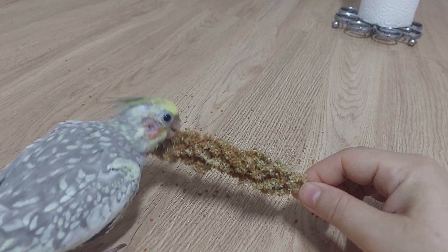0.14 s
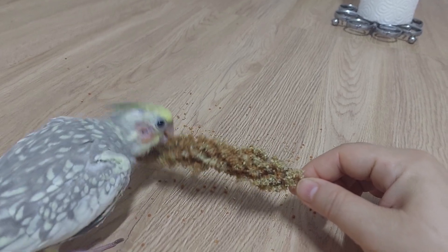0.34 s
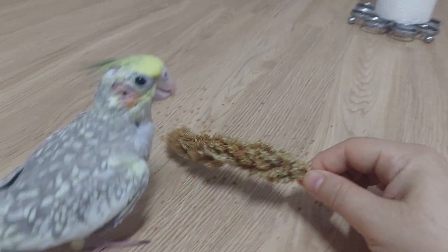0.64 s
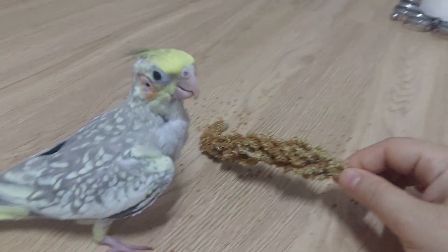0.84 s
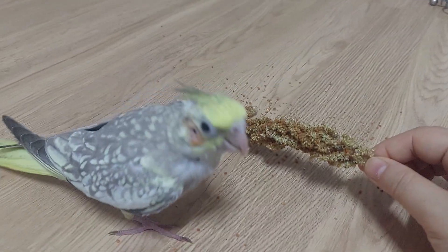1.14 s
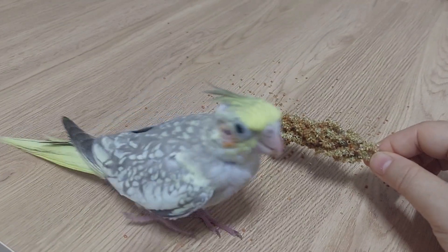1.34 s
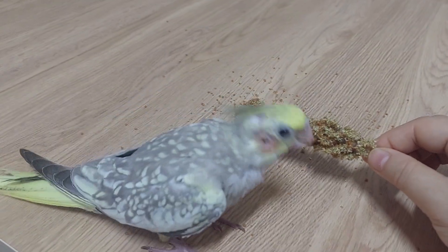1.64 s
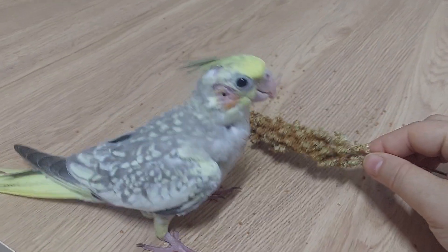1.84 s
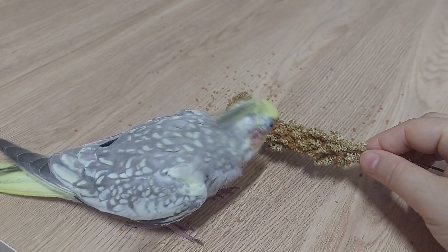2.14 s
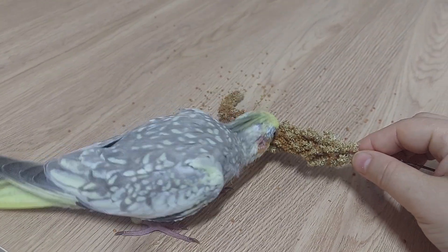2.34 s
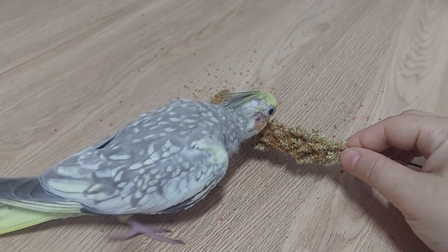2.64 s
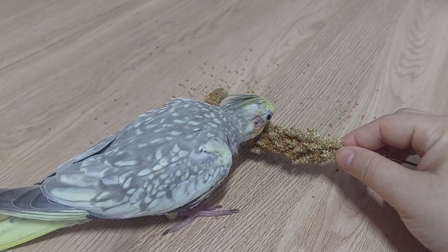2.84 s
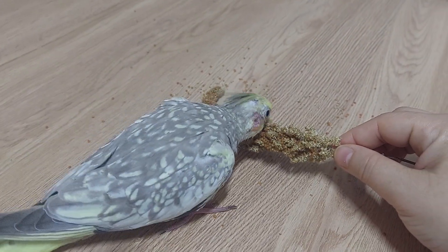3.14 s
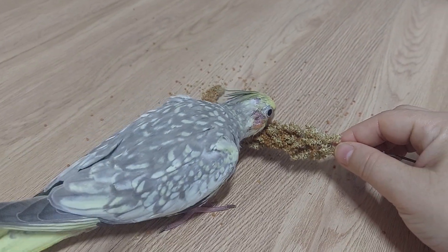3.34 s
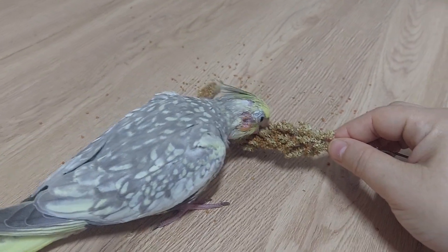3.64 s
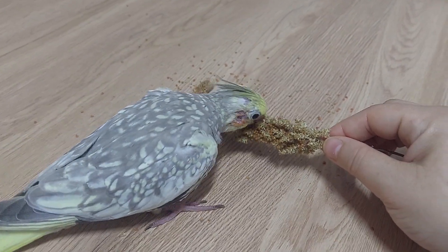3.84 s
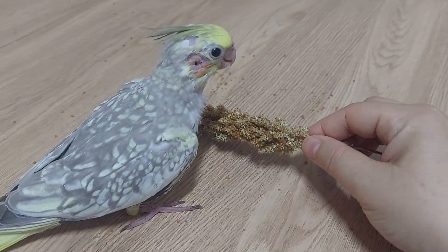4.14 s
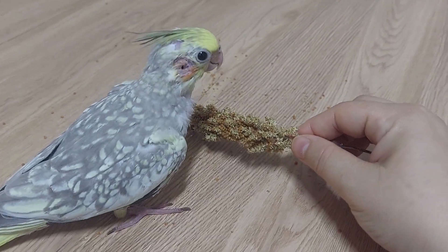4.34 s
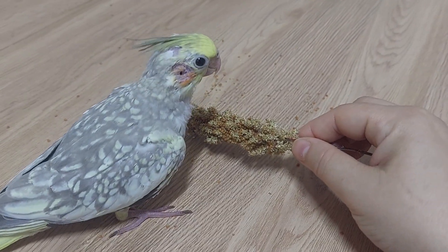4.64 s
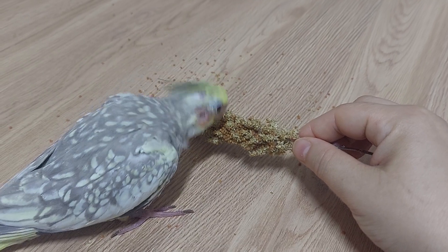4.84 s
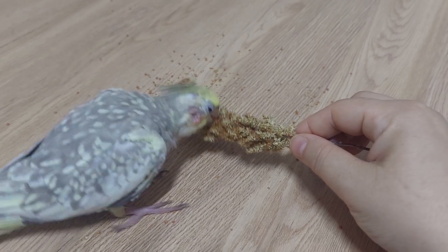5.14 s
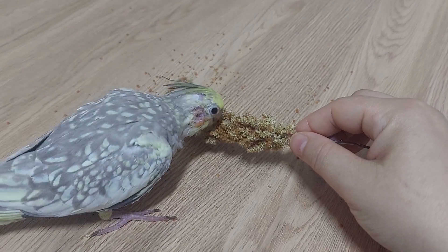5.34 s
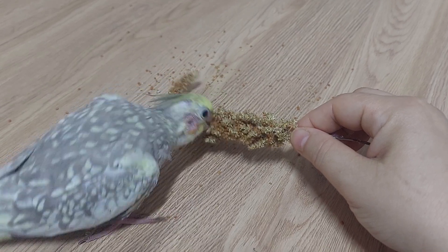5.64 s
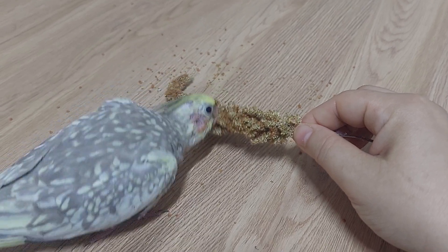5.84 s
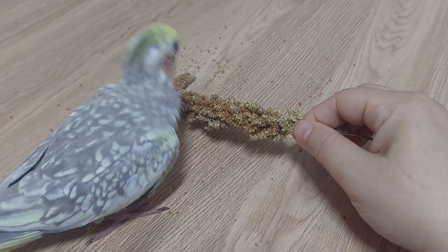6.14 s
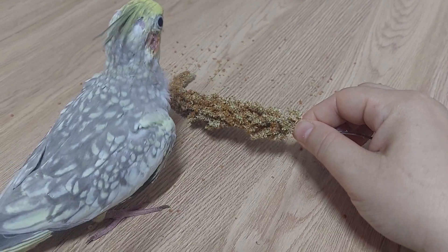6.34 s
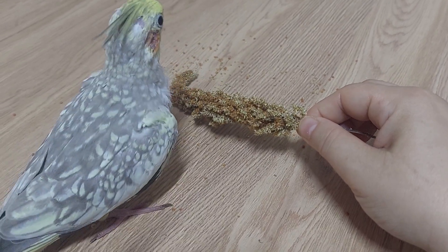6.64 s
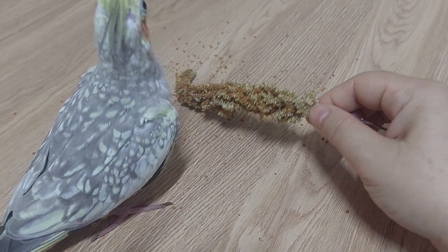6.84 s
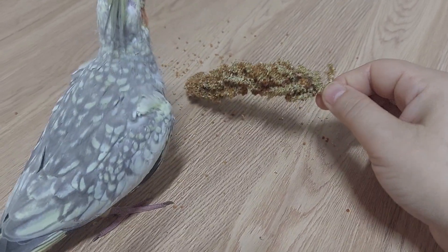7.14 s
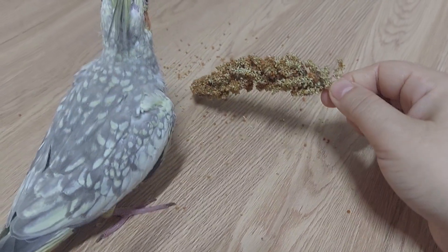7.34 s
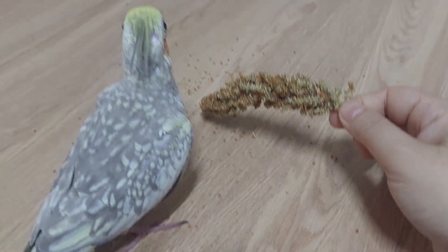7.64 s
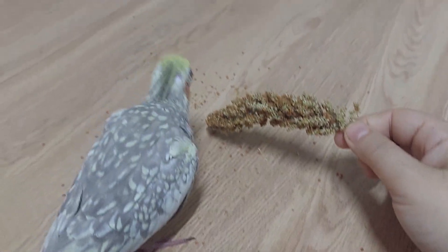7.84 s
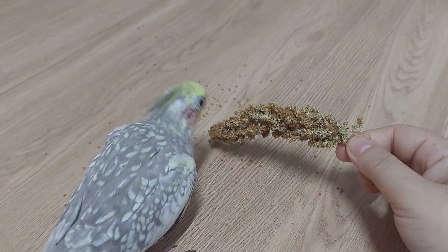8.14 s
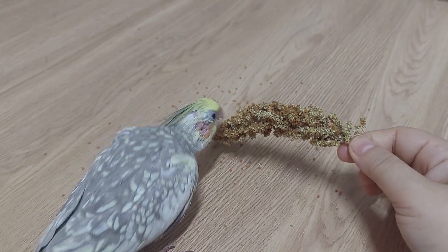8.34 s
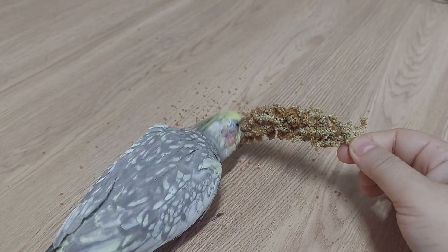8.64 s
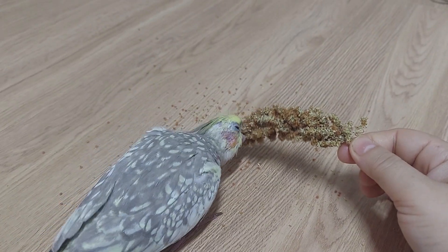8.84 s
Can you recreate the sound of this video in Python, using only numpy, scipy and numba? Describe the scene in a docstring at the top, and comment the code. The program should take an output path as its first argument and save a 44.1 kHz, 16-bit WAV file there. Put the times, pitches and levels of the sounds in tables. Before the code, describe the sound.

Harsh, noisy bird begging dominates: a short nasal note with a squeak, then long and short scratchy wheezes with barely a tenth of a second between them. Their tone shifts from bright and open to rough and whistly as the head dips to a millet spray. Every call stops abruptly on a tiny upward squeak. Light foot taps on wood, a few seed clicks, short room reflections, faint steady air, close stereo pickup.

```python
"""A cockatiel chick begs for a millet spray on a wooden surface in a quiet room, close to a two-port microphone.
Over steady room air, a short clear note of evenly beating syrinx comes first and ends in a rising squeak.
Then eleven rasps follow, from 60 ms to over a second: the syrinx flutters irregularly and rings the windpipe,
mouth and beak, then snaps shut with a tiny rising squeak. Feet patter on the wood from the first rasp on,
seeds and beak tick in the second half, and the room answers every sound briefly."""
import sys
import numpy as np
from scipy import signal
from scipy.fft import rfft, irfft, next_fast_len
from scipy.io import wavfile
from scipy.ndimage import uniform_filter1d, map_coordinates
from numba import njit

SR = 44100
rng = np.random.default_rng(int(sys.argv[2]) if len(sys.argv) > 2 else 0)


def file_out(sig):
    """Save sig as 16-bit WAV at sys.argv[1]."""
    # one column per channel
    cols = np.atleast_2d(sig).T
    # limit, then scale
    lim = np.clip(cols, -1, 1)
    pcm = np.round(lim * 32767).astype(np.int16)
    wavfile.write(sys.argv[1], SR, pcm)


N = 396459
TIME = np.arange(N) / SR


def undb(db):
    """Decibels to gain."""
    return 10 ** (np.asarray(db) / 20)


def unit(x):
    """Scale to rms 1."""
    return x / np.sqrt(np.mean(x ** 2))


def curves(rows):
    """Each column of a table, joined by straight lines in time."""
    s, *columns = np.transpose(rows)
    return [np.interp(TIME, s, column) for column in columns]


def over_frequency(rows):
    """Each column of a table, joined on a log-frequency axis, for every bin of the spectrum."""
    hz, *columns = np.transpose(rows)
    bins_hz = np.fft.rfftfreq(next_fast_len(N + SR, True), 1 / SR)
    return [np.interp(np.log(bins_hz + 1), np.log(hz), column) for column in columns]


def filtered(x, response):
    """Apply a frequency response."""
    size = next_fast_len(N + SR, True)
    return irfft(rfft(x, size) * response, size)[..., :N]


def colour(x, points):
    """Give a sound a (Hz, dB) spectral shape, at rms 1."""
    return unit(filtered(x, undb(over_frequency(points)[0])))


def walk(rate_hz):
    """Smooth chance of rms 1 that changes about rate_hz times a second."""
    k = max(int(SR / rate_hz), 2)
    return unit(uniform_filter1d(uniform_filter1d(rng.standard_normal(N), k), k))


@njit
def resonance(x, hz, width_hz):
    """State-variable band-pass whose centre moves."""
    y, band, low = np.empty(len(x)), 0., 0.
    for i in range(len(x)):
        g, k = np.tan(np.pi * hz[i] / SR), width_hz / hz[i]
        v = (band + g * (x[i] - low)) / (1 + g * (g + k))
        band, low, y[i] = 2 * v - band, low + 2 * g * v, k * v
    return y


# Spectrum of the quiet room air. Each row: frequency in Hz, relative density in dB per Hz.
QUIET = [(20, -31), (55, -5), (100, 2), (170, -7), (240, -2.5), (400, -11.5), (1000, -13.5), (3000, -20.5),
         (15000, -43)]


def quiet_air(level_db=-64.5, side_db=2.4):
    """Room air is steady noise, partly shared by the two ports and stronger in the left."""
    shared = rng.standard_normal(N)
    air = colour(shared + 1.07 * rng.standard_normal((2, N)), QUIET)
    return air * undb(level_db + side_db * np.array([[1], [-1]]))


# Track of the clear note. Each row: time in seconds, pitch in Hz, stack level in dB.
VOICED = [(0, 536, -45), (.004, 536, -28.5), (.045, 520, -27.5), (.056, 510, -33), (.065, 530, -33),
          (.07, 640, -55), (.075, 640, -100)]
# Its harmonic stack. Each row: harmonic number, relative level in dB.
HARMONICS = [(1, -15.5), (2, -1.5), (3, 1), (4, -9), (5, -15), (6, -7.5), (7, -16), (8, -15.5), (9, -30),
             (10, -17)]
# Colour of the mouth, in note and rasp. Each row: frequency in Hz, relative level in dB.
MOUTH = [(220, -29.5), (400, -28), (680, -19), (1000, -11.5), (1600, -26), (1880, 4), (2250, -10.5),
         (2700, -7.5), (3100, -12), (4200, -41), (6500, -51)]
# Colour of the air hiss, in note, squeak and rasp. Each row: frequency in Hz, relative level in dB.
AIR = [(4000, -15), (6200, -20), (7900, 2), (9000, 1.5), (10300, 6.5), (11200, 7.5), (12200, 9),
       (14000, -1), (15600, 2)]


def clear_note(rough=.02, hiss_db=-17, air_db=-24):
    """For a moment the syrinx beats evenly and gives a harmonic stack over a little hiss."""
    hz, level_db = curves(VOICED)
    phase = 2 * np.pi * np.cumsum(hz * (1 + rough * walk(810))) / SR
    stack = unit(sum(undb(db) * np.sin(k * phase) for k, (_, db) in enumerate(HARMONICS, 1)))
    puffs = rng.standard_normal(N) * (1 + np.cos(phase))  # air passes once per beat
    hiss = undb(hiss_db) * colour(puffs, MOUTH) + undb(air_db) * colour(puffs, AIR)
    return undb(level_db) * (stack + hiss)


# Squeak closing the clear note: time in seconds, top pitch in Hz, level in dB before gain_db.
NOTE_SQUEAK = (.066, 2000, -29)
# Begging calls. Each row: start in seconds, end in seconds, squeak top pitch in Hz,
# squeak level in dB before gain_db.
CALL_TIMES = [(.2475, 1.1655, 2450, -15), (1.2785, 1.957, 2350, -20), (2.099, 2.8445, 2150, -17),
              (2.968, 3.294, 2100, -15.5), (3.407, 3.467, 1950, -23), (3.5455, 4.603, 2430, -18),
              (4.765, 6.127, 2300, -28), (6.261, 6.824, 2400, -18), (6.964, 7.4585, 2100, -18),
              (7.614, 8.838, 2600, -25), (8.974, 9.3, 2200, -20)]


def squeaks(rise=.42, glide_s=.0012, lead_s=.0017, late_s=.004, half_s=.0035,
            octave_db=-22, snap_db=-29, gain_db=1):
    """The closing syrinx tightens: each call ends in a few milliseconds of upward whistle with a snap of air."""
    out, air = np.zeros(N), colour(rng.standard_normal(N), AIR)
    for end, top_hz, db in [NOTE_SQUEAK] + [call[1:] for call in CALL_TIMES]:
        near = np.abs(TIME - end) < .02
        t = TIME[near] - end - late_s
        tension = 1 - rise / (1 + np.exp((t + lead_s) / glide_s))
        phase = 2 * np.pi * np.cumsum(top_hz * tension) / SR
        swell = undb(db + gain_db) * tension * np.exp(-(t / half_s) ** 2)
        whistle = np.sin(phase) + undb(octave_db) * np.sin(2 * phase)
        out[near] += swell * (whistle + undb(snap_db) * air[near])
    return out


def flutter(rate_hz=520, jitter=.4, scatter_db=2, noise_db=0):
    """The syrinx slaps at uneven intervals while air rushes through it."""
    interval_chance, level_chance = rng.standard_normal((N // 20, 2)).T
    at = (np.cumsum(np.exp(jitter * interval_chance)) * SR / rate_hz).astype(int)
    slaps = np.bincount(at[at < N], undb(scatter_db * level_chance)[at < N], N)
    return unit(unit(slaps - slaps.mean()) + undb(noise_db) * rng.standard_normal(N))


def valve(pop=.4, pop_s=.003, swell_s=.001, catch_s=.0055):
    """Each call opens with a small pop, catches for an instant, then flows until the syrinx shuts."""
    flow = np.zeros(N)
    for start, end, *_ in CALL_TIMES:
        inside = (TIME >= start) & (TIME < end)
        age = TIME[inside] - start
        flow[inside] = pop * (age < pop_s) + 1 - np.exp(-np.maximum(age - catch_s, 0) / swell_s)
    return uniform_filter1d(flow, size=30)


# Voicing of the calls, in order. Each row: swell time constant in seconds, base levels in dB of windpipe
# (before a 2.72 dB cut), mouth, beak and air, first mouth Hz, later mouth Hz, whistle crest as a share of the call.
VOICING = [(0.19, -34.5, -32.5, -46.5, -54.5, 1170, 2470, .25),
           (0.1, -32.5, -33.5, -52, -54.5, 2430, 2740, .6),
           (0.17, -33.5, -33, -44.5, -57.5, 1410, 3700, 0.36),
           (0.11, -33.5, -30.5, -47, -58.5, 1870, 1650, 0.298),
           (0.25, -35, -32.5, -36.5, -55, 1360, 2200, 0.37),
           (0.13, -33.5, -32.5, -49.5, -56, 2200, 2530, .15),
           (0.18, -33.5, -31.5, -47, -57.5, 1880, 2940, .5),
           (0.11, -36, -32.5, -47, -59, 1820, 2200, 0.3006),
           (0.12, -36, -33.5, -47.5, -60, 1680, 2150, 0.304),
           (0.19, -35.5, -33, -51, -57.5, 1920, 3100, .66),
           (0.17, -31.5, -37.5, -60, -56, 1100, 2200, 0.79)]


def current_call():
    """Start, end and voicing of the latest call to begin, at every sample."""
    rows = np.hstack([np.array(CALL_TIMES)[:, :2], VOICING])
    return rows.T[:, np.searchsorted(rows[1:, 0] - .001, TIME)]


# Bows of the head to the millet. Each row: down in seconds, up in seconds, change in dB of windpipe,
# mouth, beak and air.
BOWS = [(0.315, .48, 7, -3.5, -4.5, -1.5), (2.25, 4.04, 8.5, -3, -1, 0), (4.867, 6.176, 9, -3, -1, 2),
        (8.3, 9.4, 9, -7, 7, 0.5)]


def bowing(bow_s=.026):
    """Posture (0 head raised, 1 down at the millet) and what it adds to the four levels, in dB."""
    down, up, *levels_db = np.transpose(BOWS)
    lowered = np.tanh((TIME - down[:, None]) / (2 * bow_s))
    raised = np.tanh((TIME - up[:, None]) / (2 * bow_s))
    bows = (lowered - raised) / 2
    return bows.sum(axis=0), np.array(levels_db) @ bows


# Moments of pressing harder or easing off. Each row: centre in seconds, half length in seconds,
# windpipe change in dB, mouth change in dB.
SURGES = [(0.562, 0.057, -1, -1.5), (1.104, 0.32, 4, 0.5), (2.377, 0.12, 1, 1.5), (3.813, 0.061, 2.5, 3),
          (4.154, 0.068, -1, -1.5), (4.8, 0.049, -3.5, 0.5), (5.224, 0.063, 3, 0), (5.507, 0.073, 1, 1.5),
          (5.674, 0.039, 1, 4.5), (7.98, 0.1, 4, -2), (8.102, 0.03, 2.5, 1.5)]


def surging():
    """Brief changes of effort: dB added to windpipe and mouth."""
    s, half_s, *levels_db = np.transpose(SURGES)
    distance = np.minimum(np.abs(TIME - s[:, None]) / half_s[:, None], 10)
    return np.array(levels_db) @ np.exp(-distance ** 2)


# Openings of the gape. Each row: centre in seconds, half length in seconds, beak resonance in Hz,
# beak ring change in dB, hiss level in dB at the widest.
GAPES = [(0.525, 0.092, 3180, 11, -58), (1.656, .1, 3300, -11, -72), (2.152, 0.035, 3650, 10.5, -66),
         (2.375, 0.098, 3880, 4, -48), (4.842, .033, 3630, 14, -53.5), (4.957, 0.019, 4000, 14, -70),
         (5.307, 0.075, 4300, 7, -53), (5.807, 0.19, 3640, 8, -75), (6.414, 0.027, 4000, 11.5, -50.5),
         (6.52, 0.016, 4000, 7.5, -64), (6.593, .018, 4070, -3, -50), (6.67, 0.016, 4100, 5, -49),
         (7.152, 0.037, 3750, 14.5, -54), (8.077, .045, 3440, 15.5, -65), (8.287, .05, 3750, 10.5, -54),
         (8.453, .12, 4170, 10.5, -49.5), (8.825, .04, 4300, 5.5, -57)]
BEAK_REST_HZ = 3994  # between gapes


def gaping():
    """Each gape briefly retunes the beak, raises or lowers its ring and lets out a hiss: (Hz, dB, hiss gain)."""
    pull_hz, total, ring_change_db, hiss = np.zeros((4, N))
    for s, half_s, hz, change_db, hiss_db in GAPES:
        near = np.abs(TIME - s) < np.pi * half_s
        opening = np.exp(-((TIME[near] - s) / half_s) ** 2)
        total[near] += opening
        pull_hz[near] += opening * (hz - BEAK_REST_HZ)
        ring_change_db[near] += opening * change_db
        hiss[near] += opening * undb(hiss_db)
    return BEAK_REST_HZ + pull_hz / np.maximum(total, 1), ring_change_db, hiss


def self_limited(x, strength=.36):
    """A driven vibration holds its own swing: chance swells of a few milliseconds are evened out."""
    power = uniform_filter1d(x ** 2, size=260) + 1e-9
    return unit(x / power ** (strength / 2))


# Colour of the windpipe. Each row: frequency in Hz, relative level in dB.
THROAT = [(200, -59), (400, -36.5), (660, -23.5), (830, -11), (1150, 4.5), (1380, 8), (1600, 1.5),
          (1750, -4), (3500, -71)]


def windpipe(source, centre_hz, mouth_db, whistle=11.3, drift=.028, roughness=.042):
    """The windpipe rings with the flutter; when the mouth is quiet it breaks into a rough, wavering whistle."""
    hz = centre_hz * (1 + drift * walk(48.1))
    tone = np.sqrt(2) * np.sin(2 * np.pi * np.cumsum(hz * (1 + roughness * walk(700))) / SR)
    ring = unit(resonance(flutter(), hz, 75.0))
    lock = whistle * np.clip(-mouth_db / 9, .2, 1)
    ring = (ring + lock * tone) / np.sqrt(1 + lock ** 2)
    share = np.clip(.3 - .036 * mouth_db, .25, .65)
    return self_limited(np.sqrt(1 - share) * colour(source, THROAT) + np.sqrt(share) * ring)


def cavity(source, points, hz, width_hz, ring_db):
    """A broad colour with one steep, moving resonance standing out of it."""
    once = resonance(flutter(), hz, float(width_hz))
    ring = unit(resonance(once, hz, float(width_hz)))
    return unit(colour(source, points) + undb(ring_db) * ring)


def low_hollow(source, age, start_hz=474, rise_hz_per_s=133, width_hz=330):
    """A faint low resonance climbs through each call."""
    hz = start_hz + rise_hz_per_s * age
    once = resonance(source, hz, float(width_hz))
    return unit(resonance(once, hz, float(width_hz)))


# Every call starts this far below its full level and swells; the beak is held back most.
WINDPIPE_SWELL_DB, MOUTH_SWELL_DB, BEAK_SWELL_DB, AIR_SWELL_DB = 9, 9.5, 16, 14.5
WAVER_DB, WAVER_HZ = 1.22, 47  # rms level waver of a bowed call
HOLLOW_DB, HOLLOW_BOWED_DB = -23, -3  # relative to the swelling windpipe; a bowed head shades it further
# The windpipe's pitch arches once in each call; the arch's half length is a share of the call.
WINDPIPE_HZ, ARCH_HZ, ARCH_SHARE = 1387.6, 114.3, .3
# The mouth resonance glides from its first to its later pitch over this share of each call;
# a bow takes away this share of the glide.
GLIDE_SHARE, BOW_HOLDBACK = .54, .58
BURST_DB, BURST_S = 3.5, .022  # pent-up air makes the first moment of a call louder
# Colour of the beak. Each row: frequency in Hz, relative level in dB.
BEAK = [(2200, -12), (3100, 0.5), (3650, 11.5), (4200, -3), (5100, 2.5), (6000, -35), (8000, -44)]
# Colour of the hiss from an open gape. Each row: frequency in Hz, relative level in dB.
GAPE = [(3000, -22), (4400, -10), (5400, 12), (6600, -2), (8000, -19), (10000, -57), (14000, -11)]


def rasp():
    """Flutter rings windpipe, mouth and beak; air hisses at the gape's edges. Swell and posture set the balance."""
    start, end, swell_s, pipe_db, mouth_db, beak_db, air_db, first_hz, later_hz, crest = current_call()
    age = np.maximum(TIME - start, 0)
    progress = age / (end - start)
    slack = np.exp(-age / swell_s)  # 1 at the start of a call, 0 at full effort
    bow, (bow_pipe_db, bow_mouth_db, bow_beak_db, bow_air_db) = bowing()
    push_pipe_db, push_mouth_db = surging()
    beak_hz, ring_change_db, gape = gaping()

    pipe_db = pipe_db - WINDPIPE_SWELL_DB * slack
    hollow_db = pipe_db + HOLLOW_DB + HOLLOW_BOWED_DB * bow
    pipe_db = pipe_db + bow_pipe_db + push_pipe_db + bow * WAVER_DB * walk(WAVER_HZ)
    mouth_db = mouth_db - MOUTH_SWELL_DB * slack + bow_mouth_db + push_mouth_db
    mouth_db = mouth_db + bow * WAVER_DB * walk(WAVER_HZ)
    beak_db = beak_db - BEAK_SWELL_DB * slack + bow_beak_db + ring_change_db
    air_db = air_db - AIR_SWELL_DB * slack + bow_air_db

    pipe_hz = WINDPIPE_HZ + ARCH_HZ * np.exp(-((progress - crest) / ARCH_SHARE) ** 2)
    glide = np.sin(np.pi / 2 * np.minimum(progress / GLIDE_SHARE, 1)) ** 2 * (1 - BOW_HOLDBACK * bow)
    mouth_hz = first_hz + (later_hz - first_hz) * glide
    # the thin top hiss climbs as the mouth takes over from the windpipe
    air_hz = np.interp(mouth_db - pipe_db, [-5, 0, 5], [7900, 11000, 13000])

    source = flutter(noise_db=3)
    voice = undb(pipe_db - 2.72) * windpipe(source, pipe_hz, mouth_db - pipe_db)
    voice += undb(mouth_db) * cavity(source, MOUTH, mouth_hz, width_hz=808, ring_db=-.5)
    voice += undb(beak_db + 2 * walk(40)) * cavity(flutter(), BEAK, beak_hz, width_hz=820, ring_db=1)
    hiss = cavity(flutter(noise_db=-17), AIR, air_hz, width_hz=3900, ring_db=-4.5)
    voice += undb(air_db + .5 * walk(34)) * hiss
    voice += undb(hollow_db) * low_hollow(source, age)
    voice += gape * colour(flutter(), GAPE)
    burst = undb(BURST_DB * np.exp(-(age / BURST_S) ** 2))
    return voice * burst * valve()


def strikes(events, ring):
    """Play a short ring at each (s, peak dB)."""
    blows = np.zeros(N)
    for s, db in events:
        blows[int(s * SR)] = undb(db)
    return signal.fftconvolve(blows, ring / np.abs(ring).max())[:N]


# Feet landing on the wood. Each row: time in seconds, peak in dB.
STEPS = [(.632, -37), (.735, -41), (1.863, -42), (8.527, -50)]
# Modes of the wood. Each row: frequency in Hz, relative level in dB, t60 in seconds.
WOOD_MODES = [(95, -8, 0.32), (252, -8, 0.29), (329, 3, 0.17), (379, 4.5, 0.13)]


def footfalls():
    """Soft footfalls ring the decaying modes of the wood."""
    t = TIME[:SR // 4]
    wood = sum(undb(db - 60 * t / t60) * np.sin(2 * np.pi * hz * t) for hz, db, t60 in WOOD_MODES)
    return strikes(STEPS, wood)


# Ticks of seeds and beak. Each row: time in seconds, peak in dB.
TICKS = [(4.681, -42), (7.824, -31), (7.931, -28)]


def ticks(decay_s=.00098):
    """Dry seeds and beak tick: bright noise with a decay constant of about a millisecond."""
    t = TIME[:SR // 4]
    crack = np.diff(rng.standard_normal(len(t) + 1)) * np.exp(-t / decay_s)
    return strikes(TICKS, crack)


ROOM_T60_S, ROOM_TREBLE_T60_S, ROOM_DB, EARLY_DB = .32, .25, -11, -7.5


def room(x, early_s=.0033, first_s=.0016, treble_hz=3500, treble_db=3, early_treble_db=5):
    """Near surfaces scatter the treble within milliseconds; the walls add a short tail that dulls as it fades."""
    t = TIME[:SR // 2]
    noise = rng.standard_normal((2, len(t)))
    low = signal.sosfilt(signal.butter(2, treble_hz, fs=SR, output="sos"), noise)
    # sign flipped so that the two bands add in phase at the crossover
    high = -signal.sosfilt(signal.butter(2, treble_hz, "high", fs=SR, output="sos"), noise)
    tail = low * undb(-60 * t / ROOM_T60_S) + high * undb(treble_db - 60 * t / ROOM_TREBLE_T60_S)
    tail *= t > .008
    tail /= np.sqrt(np.sum(undb(-120 * t / ROOM_T60_S)))
    early = (low + undb(early_treble_db) * high) * np.exp(-t / early_s) * (t > first_s)
    early /= np.sqrt(early_s * SR / 2)
    answer = undb(ROOM_DB) * tail + undb(EARLY_DB) * early
    return signal.fftconvolve(x[None], answer, axes=1)[:, :N]


def glance(x, lag_s=.000696, sway=.079, strength=.88, above_hz=4500):
    """Treble glances off the wood with a wandering lag, so a comb of peaks slides about."""
    treble = signal.sosfilt(signal.butter(2, above_hz, "high", fs=SR, output="sos"), x)
    lag = lag_s * np.exp(sway * walk(2.5))
    return x + strength * np.interp(TIME - lag, TIME, treble)


# Turns of the head. Each row: time in seconds, left minus right in dB before scene() takes off 4 and scales by 0.63.
HEAD = [(.26, 4), (.7, 10.5), (1.28, 9), (1.7, 4), (2.0, 7), (2.25, 3), (3.9, 3.5), (4.5, 6.5), (5.2, 5),
        (6.2, 6), (6.4, 12.5), (7.5, 13), (8.2, 4)]
# The two ports. Each row: frequency in Hz, left minus right in dB, radians by which left leads.
PORTS = [(100, 33, 2.5), (252, 2, 0.2), (534, -10.5, 0.8), (664, -1.5, 2), (970, 5, 0.73),
         (1237, -0.5, 1.35), (1700, 3, -0.17), (1976, 12, 3.5), (2440, 15.5, 0.3), (3760, 0.5, 1.83),
         (4860, 6.5, 1.42), (8200, -3, 4), (12500, 5, 4.5), (15100, -2, 5.5)]


def scene():
    """The bird reaches each port with its own colour and delay, over the room's answer and its quiet air."""
    air = quiet_air()
    bird = clear_note() + squeaks() + rasp() + footfalls() + ticks()
    side = np.array([[1], [-1]])  # left, right
    balance_db, lead_rad = over_frequency(PORTS)
    gains = undb(side * balance_db / 2)
    gains /= np.sqrt(np.mean(gains ** 2, axis=0))
    direct = filtered(bird, gains * np.exp(1j * side * lead_rad / 2))
    # a head turned to the left is louder and earlier in the left port
    turn_db = .63 * (curves(HEAD)[0] - 4)
    advances_s = side * turn_db * 8e-6
    shifted = [map_coordinates(port, [(TIME + advance_s) * SR], order=3)
               for port, advance_s in zip(direct, advances_s)]
    direct = np.array([glance(port) for port in shifted])
    direct *= undb(turn_db * np.array([[.3], [-.7]]))
    return direct + filtered(room(bird), gains ** .34) + air


def record(dry, top_hz=15550):
    """The recorder cuts the top with a steep elliptic low-pass."""
    return signal.sosfilt(signal.ellip(10, .2, 80, top_hz, fs=SR, output="sos"), dry)


dry = scene()
out = record(dry)
file_out(out)
```